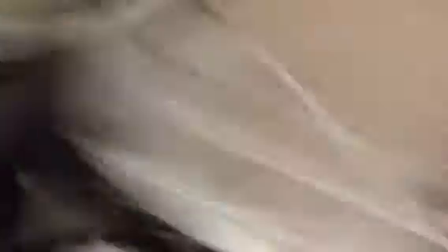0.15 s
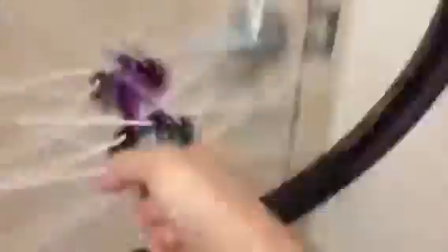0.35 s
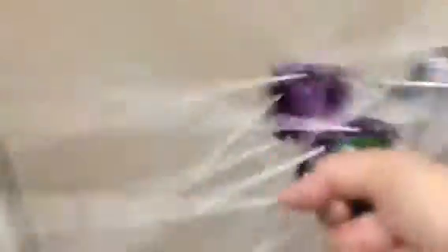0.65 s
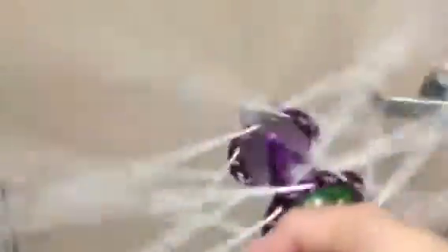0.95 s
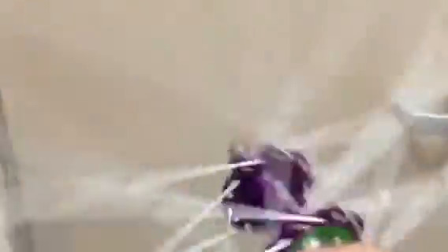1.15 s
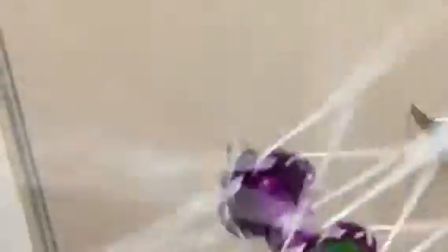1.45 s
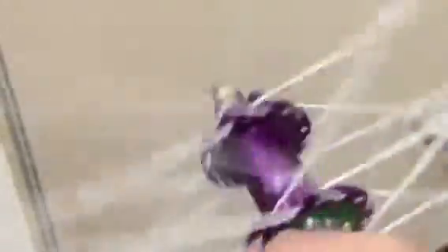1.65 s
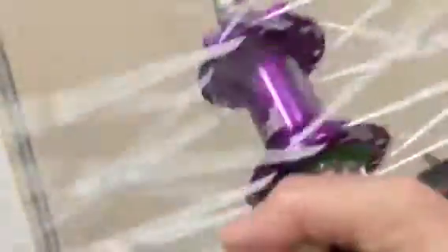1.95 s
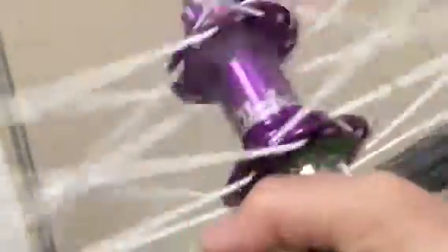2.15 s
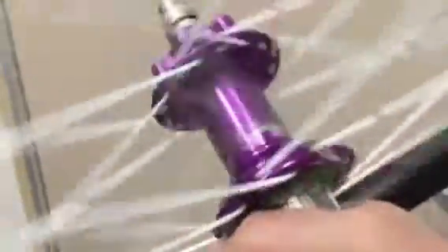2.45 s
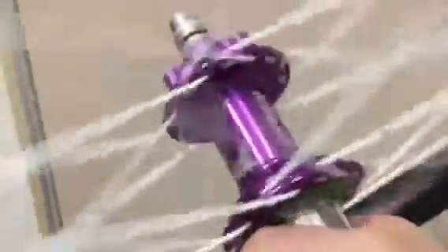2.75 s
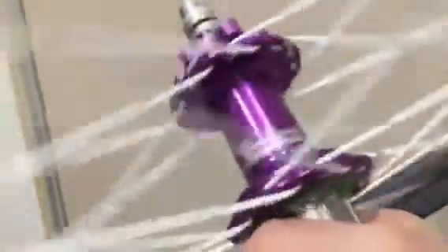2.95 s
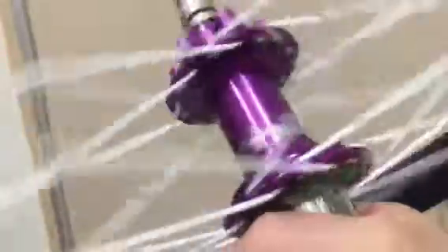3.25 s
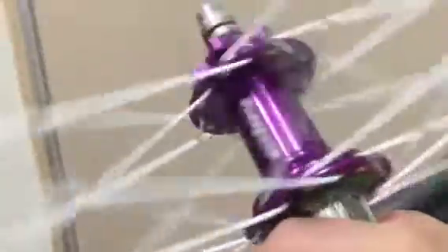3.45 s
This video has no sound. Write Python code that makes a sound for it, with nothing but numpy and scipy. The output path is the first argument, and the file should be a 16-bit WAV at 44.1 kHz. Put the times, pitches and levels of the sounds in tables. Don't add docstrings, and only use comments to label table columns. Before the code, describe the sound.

Close phone pickup of a coasting bicycle hub in a small, echoing room: dense, bright metallic ratcheting throughout, a few bumps right after the start, then fainter knocks as the clicking gradually slows, unevenly, to the end.

```python
import sys
import numpy as np
from scipy import signal
from scipy.fft import rfft, irfft
from scipy.io import wavfile

SR = 44100
rng = np.random.default_rng(int(sys.argv[2]) if len(sys.argv) > 2 else 0)


def volts_from_db(level):
    exponent = np.asarray(level, float) / 20
    return 10 ** exponent


def waveform_to_disk(signal):
    frames = np.transpose(np.atleast_2d(signal))
    scaled = np.clip(frames, -1, 1) * 32767
    samples = np.round(scaled).astype(np.int16)
    wavfile.write(sys.argv[1], SR, samples)


N = 158760

# (time [s], teeth passed [1/s])
WHEEL_SPEED = [(0.0, 137.12), (0.157, 139.74), (0.313, 136.15), (0.47, 139.26), (0.626, 133.53),
               (0.783, 132.86), (0.939, 135.16), (1.096, 132.78), (1.252, 128.77), (1.409, 107.65),
               (1.565, 110.79), (1.722, 105.65), (1.878, 123.03), (2.035, 118.32), (2.191, 118.61),
               (2.348, 111.96), (2.504, 110.14), (2.661, 109.32), (2.817, 103.59), (2.974, 101.69),
               (3.13, 100.37), (3.287, 97.62), (3.443, 96.62), (3.6, 92.91)]
# (time [s], level [dB], short spokes facing the phone [dB],
# shell facing the phone [dB], ticks through the hand [dB])
BUZZ_BALANCE = [(0, -27.5, 12.5, -8, -36), (.06, -23, 2, -2.5, -70), (.2, -22.5, -2, -1, -46),
                (.28, -23.5, 0.5, 0, -58), (.35, -24, 0, 1, -51), (.7, -22.5, -2, 0.5, -41),
                (.95, -23, 0.5, 0.5, -44), (1.3, -22.5, -4.5, -0.5, -36), (1.55, -21.5, -2, 1, -43),
                (1.62, -22.5, -1.5, 0.5, -31), (1.75, -22, -1.5, 0, -45), (2.1, -23, -1, 1, -27),
                (2.45, -22, -2.5, -0.5, -31), (2.7, -22, -2, 0.5, -31), (3.0, -22.5, -1, 0, -27),
                (3.3, -22.5, 0, 0.5, -28.5), (3.5, -21, -2.5, -1, -32), (3.6, -28.5, 4.5, 2, -25)]
# (time [s], peak
# level [dB])
HARD_DROPS = [(0.0533, -20), (0.0743, -11.5), (0.1177, -18), (0.1825, -15), (0.2179, -12.5), (0.2579, -10),
              (0.3701, -19), (0.4524, -12), (0.4799, -17), (0.5537, -10), (0.6749, -30), (0.7238, -10.5),
              (0.9732, -22), (1.0171, -22), (1.2042, -14), (1.2287, -12), (1.3758, -18), (1.4861, -26),
              (1.505, -16), (1.6512, -14), (2.0832, -19), (2.1835, -13), (2.2508, -18.5), (2.2867, -14),
              (2.3222, -16), (2.3301, -13.5), (2.3656, -12), (2.385, -14), (2.3955, -11.5), (2.4928, -29),
              (2.5921, -12), (2.6848, -22), (2.7392, -17), (2.7577, -10.5), (2.7876, -21), (2.7961, -12.5),
              (2.8345, -15), (2.854, -15), (2.8739, -13), (2.9038, -16), (2.9133, -13.5), (2.9328, -14),
              (2.9727, -11), (3.0011, -13), (3.0126, -10), (3.0505, -13.5), (3.0705, -14), (3.0904, -14),
              (3.1104, -19), (3.1588, -12.5), (3.2516, -12.5), (3.2925, -14), (3.3743, -15), (3.3957, -15),
              (3.4157, -17), (3.4257, -13), (3.5494, -22), (3.5623, -8.5)]
# (frequency [Hz], width [Hz], level [dB])
SPOKE_MODES = [(1136, 3.1, -3), (1216, 9.3, -5), (1326, 54, -9.5), (1512, 34, -5.5), (1684, 90, -5.5),
               (1826, 59, -6.5), (2051, 60, -7), (2450, 26, -8.5), (2854, 31, -0.5), (3104, 136, -4.5),
               (3273, 230, -2), (3559, 21, -0.5), (3918, 49, 1.5), (4323, 15, -2)]
# (frequency [Hz], width [Hz], level [dB])
SHELL_MODES = [(4544, 80, -8), (4713, 40, -3), (5350, 54, 2), (5700, 156, -2), (6310, 290, -6),
               (6510, 250, -3), (6755, 86, -7), (6980, 160, 3.5), (7320, 57, 2.5), (7840, 160, 0),
               (8500, 240, 0), (8640, 38, -17), (9240, 85, 3), (6200, 94, -29)]
# (frequency [Hz], width [Hz], level [dB])
PAWL_MODES = [(9650, 400, -4), (11400, 600, -5), (12100, 350, -1), (12750, 450, -3), (13550, 650, 0),
              (14800, 600, -2), (15550, 600, 0)]
# (time [s], length
# [s], frequency [Hz], level [dB])
FLARES = [(.03, 0.13, 3100, -24), (0.033, .1, 5350, -7), (0.078, 0.12, 1340, 2), (.1, 0.2, 1750, 4.5),
          (0.154, 0.22, 2200, 15), (0.22, 0.059, 1730, 10.5), (0.253, 0.088, 7370, 10.5),
          (0.265, 0.086, 8250, 5), (0.32, 0.066, 2450, 19), (0.397, .15, 1500, -2), (0.557, 0.11, 2050, 9),
          (0.61, 0.17, 1700, 6), (0.878, 0.57, 3150, 3), (0.938, .1, 5350, 0), (1.074, 0.13, 7000, 4.5),
          (1.253, 0.077, 5350, 4), (1.3, 0.3, 3070, 8.5), (1.42, 0.2, 1280, 10), (1.622, 0.068, 5350, 14),
          (1.617, 0.066, 7000, 7.5), (1.626, 0.069, 8700, 3), (1.78, .15, 1290, 7), (1.86, 0.17, 5350, 5),
          (1.875, 0.11, 3130, 1), (1.965, 0.041, 1750, 5), (2.146, .1, 5350, -6), (2.202, 0.25, 3100, 4),
          (2.34, 0.27, 1110, 8), (2.55, 0.097, 2200, 5), (2.627, .1, 1560, 11), (2.747, .2, 1120, 8),
          (3.032, .15, 3240, 0), (3.178, 0.044, 1800, 14.5), (3.325, .12, 1120, 7), (3.35, .1, 5350, -7),
          (3.446, .1, 1750, 4), (3.46, .08, 5350, 4)]
# (frequency [Hz], density [dB per Hz])
SNAP_SPECTRUM = [(700, -16.5), (1300, -8.5), (2600, 3), (4500, -4.5), (7500, 4.5), (9300, 12), (10300, -22),
                 (16000, 3)]
# (time [s], rumble level [dB], air level [dB])
HANDLING = [(0.0, -63, -7), (0.12, -50, 3), (0.22, -33.5, -1), (.38, -50, -8), (.5, -54, -3.5),
            (0.71, -75, -3), (1.28, -68, -1.5), (1.53, -67, -2.5), (2.26, -64, -2), (2.6, -71, -3),
            (3.1, -61, -2), (3.6, -58, -0.5)]
# (frequency [Hz], density [dB per Hz])
AIR_SPECTRUM = [(15, -21), (30, -22), (128, -1.5), (220, -10.5), (284, -11), (487, -17.5), (900, -12),
                (1170, -65)]
# (frequency [Hz], rms level [dB])
MAINS_HUM = [
    (119.5, -58),
    (274.5, -63.5),
]
# (time [s], crack level [dB], crack frequency [Hz],
# thump level [dB], thump frequency [Hz])
KNOCKS = [(.0990, -21.5, 690, -12.5, 74), (0.1015, -15.5, 284, -45, 67.5), (0.1873, -14.5, 870, -47, 75.4),
          (0.1889, -13, 340, -23, 72), (0.216, -29, 307, -28, 68), (.245, -57, 300, -35, 65),
          (0.271, -51, 300, -28, 80), (0.3, -44, 200, -40, 90), (.33, -55, 250, -36, 65),
          (.645, -27, 220, -33, 120), (0.702, -55, 200, -33, 65), (.875, -33, 280, -38, 70),
          (1.611, -34, 400, -42, 150), (2.07, -35, 260, -38, 65), (2.199, -42, 300, -41, 62),
          (3.39, -30, 605, -49, 90)]

TEETH, FIRST_TOOTH = 36, 0.52
SCATTER_MS, CLICK_SPREAD_DB, STEP_PER_DB = 1.5, 1.5, 0.0953
PLAIN_DROP_DB, HARD_SHARE = -17.5, 0.9
STRIKE_SMEAR_MS, MODE_SPREAD_DB, SWAY_DB, FLARE_OCTAVES = 0.25, 2.5, 2, 0.092
SNAP_DB, SPOKES_DB, LONG_SPOKES_DB, SHELL_DB, PAWLS_DB = -6, -10.5, -4.5, -6, -9
RATTLE_S, RATTLE_DB, EDGE_HZ, EDGE_DB, LOWEST_RING_HZ = 0.0057, -1, 9360, -17, 1085
PUSH_DB, PUSH_HZ, TICK_HZ, LOW_TICK_HZ, LOW_TICK_DB = -31, 99, 740, 280, -19.5
TICK_STEP_DB, TICK_SPREAD_DB, TICK_LAG_MS = 0.9, 1.3, 1.2
AIR_DB, ROOM_T60_S, ROOM_DB, ROOM_CHANGE_S = -49.5, 0.39, -0.5, 0.04
CRACK_T60_S, THUMP_T60_S = 0.0078, 0.04
CASE_HZ, CASE_DB, CASE_T60_S = 690, -28.5, 0.06


def rms_one(x):
    return x / np.sqrt(np.mean(x ** 2) + 1e-20)


def in_time(rows):
    s, *columns = np.transpose(rows)
    return [np.interp(np.arange(N) / SR, s, c) for c in columns]


def colour(x, points):
    hz, db = np.transpose(points)
    size = 4096
    bin_hz = np.arange(size // 2 + 1) * SR / size
    log_gain = np.interp(np.log(bin_hz + 1), np.log(hz), db) * np.log(10) / 20
    cepstrum = irfft(log_gain)
    cepstrum[1:size // 2] *= 2
    cepstrum[size // 2 + 1:] = 0
    return signal.fftconvolve(x, irfft(np.exp(rfft(cepstrum))))[:N]


def resonance(x, hz, width):
    r = np.exp(-np.pi * width / SR)
    poles = [1, -2 * r * np.cos(2 * np.pi * hz / SR), r * r]
    return signal.lfilter([(1 - r * r) / 2, 0, (r * r - 1) / 2], poles, x)


def ring(clicks, hz, t60):
    r, w = volts_from_db(-60 / (t60 * SR)), 2 * np.pi * hz / SR
    return signal.lfilter([0, np.sin(w)], [1, -2 * r * np.cos(w), r * r], clicks + 1e-18)


def train(at, size):
    return np.bincount(at, size, N) + 1e-18


def drops():
    teeth = np.cumsum(in_time(WHEEL_SPEED)[0]) / SR + FIRST_TOOTH
    at = np.flatnonzero(np.diff(np.floor(teeth)) > 0)
    draw = rng.standard_normal((len(at), 2, 3))
    late = np.abs(draw[:, 0]) * SCATTER_MS * [0.1, 1, 2] * SR / 1000
    tooth = np.arange(len(at))[:, None] + 0 * late
    step_db = STEP_PER_DB * np.maximum(in_time(BUZZ_BALANCE)[3] + 50, 0)
    db = CLICK_SPREAD_DB * draw[:, 1] + step_db[at, None] * (-1) ** tooth + [0, -3.0, -6.0]
    hard_s, hard_db = np.transpose(HARD_DROPS)
    nearest = np.abs(at[:, None] - hard_s * SR).argmin(axis=0)
    db[nearest, 0] = HARD_SHARE * (hard_db - PLAIN_DROP_DB)
    when = np.clip(at[:, None] + late, 0, N - 1).astype(int)
    return when.ravel(), tooth.ravel(), volts_from_db(db).ravel()


def flare_db(hz, s):
    at, length, centre_hz, db = np.transpose(FLARES)[:, :, None]
    time_off = 2 * (s - at) / length
    pitch_off = np.log2(hz / centre_hz) / FLARE_OCTAVES
    return np.sum(db * np.exp(-time_off ** 2 - pitch_off ** 2), axis=0)


def body(modes, at, tooth, size, shake):
    out, noise = 0, rng.standard_normal(N)
    for hz, width, db in modes:
        spread, sign, smear = rng.standard_normal((3, len(at)))
        turns = tooth / TEETH * rng.integers(1, 4) + rng.random()
        swing_db = SWAY_DB * np.cos(2 * np.pi * turns) + flare_db(hz, at / SR)
        gain = volts_from_db(db + np.interp(np.arange(N), at[::3], swing_db[::3]))
        when = np.clip(at + np.abs(smear) * STRIKE_SMEAR_MS * SR / 1000, 0, N - 1).astype(int)
        strike = train(when, size * volts_from_db(MODE_SPREAD_DB * spread) * np.sign(sign))
        out = out + gain * resonance(strike + shake * noise, hz, width)
    return rms_one(out)


def pawl_snap(at, size, clicks, shake):
    snap = rms_one(colour(clicks + shake * rng.standard_normal(N), SNAP_SPECTRUM))
    edge = rms_one(resonance(train(at[::3], size[::3] ** 2), EDGE_HZ, 1500.0))
    return volts_from_db(SNAP_DB) * snap + volts_from_db(EDGE_DB) * edge


def through_hand(at, tooth, tick_db):
    spread_db = TICK_SPREAD_DB * rng.standard_normal(len(at) // 3)
    first = train(at[::3], volts_from_db(TICK_STEP_DB * (-1) ** tooth[::3] + spread_db))
    first = np.roll(first, int(TICK_LAG_MS * SR / 1000))
    push = rms_one(resonance(first ** 0.5, PUSH_HZ, 49.0))
    low_tick = volts_from_db(LOW_TICK_DB) * resonance(first, LOW_TICK_HZ, 210.0)
    tick = rms_one(resonance(first, TICK_HZ, 880.0) + low_tick)
    return volts_from_db(PUSH_DB) * push - volts_from_db(tick_db + 1.5) * tick


def freehub():
    at, tooth, size = drops()
    size = size / np.sqrt(np.sum(size ** 2) / N)
    clicks = train(at, size)
    fade = np.exp(-1 / (RATTLE_S * SR))
    shake = volts_from_db(RATTLE_DB) * rms_one(signal.lfilter([1], [1, -fade], clicks))
    level_db, short_db, facing_db, tick_db = in_time(BUZZ_BALANCE)
    hits = at, tooth, size, shake

    snap = pawl_snap(at, size, clicks, shake)
    bright = volts_from_db(SHELL_DB) * body(SHELL_MODES, *hits) + volts_from_db(PAWLS_DB) * body(PAWL_MODES, *hits)
    spokes = volts_from_db(LONG_SPOKES_DB - facing_db) * body(SPOKE_MODES[:7], *hits)
    spokes = spokes + volts_from_db(short_db) * body(SPOKE_MODES[7:], *hits)
    buzz = snap + volts_from_db(SPOKES_DB) * spokes + volts_from_db(facing_db) * bright
    low_cut = signal.butter(10, LOWEST_RING_HZ, "high", fs=SR, output="sos")
    buzz = signal.sosfilt(low_cut, buzz)
    return volts_from_db(level_db) * buzz, volts_from_db(level_db) * through_hand(at, tooth, tick_db)


def room(x):
    t = np.arange(SR // 3) / SR
    shape = volts_from_db(-60 * t / ROOM_T60_S) * (t > 0.003)
    span = (np.arange(N) / (ROOM_CHANGE_S * SR)).astype(int)
    pattern = rng.integers(0, 12, 400)[span]
    tails = rng.standard_normal((12, len(t))) * shape / np.sqrt(np.sum(shape ** 2))
    echo = sum(signal.fftconvolve(x * (pattern == k), tail) for k, tail in enumerate(tails))
    echo[:len(t) - 1] += 1.4 * echo[N:]
    return echo[:N]


def background():
    rumble_db, air_db = in_time(HANDLING)
    air = volts_from_db(AIR_DB + air_db) * rms_one(colour(rng.standard_normal(N), AIR_SPECTRUM))
    lumps = resonance(resonance(rng.standard_normal(N), 50, 62.0), 50, 62.0)
    rumble = volts_from_db(rumble_db) * rms_one(lumps)
    hum = sum(volts_from_db(db) * rms_one(resonance(rng.standard_normal(N), hz, 4.3)) for hz, db in MAINS_HUM)
    return air + rumble + hum


def knocks():
    out = np.zeros(N)
    for s, crack_db, crack_hz, thump_db, thump_hz in KNOCKS:
        click = train([int(s * SR)], [1.0])
        out -= volts_from_db(crack_db) * ring(click, crack_hz, CRACK_T60_S)
        out -= volts_from_db(thump_db) * ring(np.roll(click, 300), thump_hz, THUMP_T60_S)
    first = train([int(KNOCKS[0][0] * SR)], [1.0])
    return out - volts_from_db(CASE_DB) * ring(first, CASE_HZ, CASE_T60_S)


def scene():
    buzz, push = freehub()
    return (buzz + volts_from_db(ROOM_DB) * room(buzz) + push + knocks() + background())[None]


def band_limit(x):
    return signal.sosfilt(signal.butter(12, 15730, fs=SR, output="sos"), x)


def record(dry):
    low_cut = signal.butter(3, 45, "high", fs=SR, output="sos")
    top_cut = signal.ellip(14, 0.3, 90, 15730, fs=SR, output="sos")
    mix = signal.sosfilt(top_cut, signal.sosfilt(low_cut, dry))
    return band_limit(mix)


dry = scene()
out = record(dry)
waveform_to_disk(out)
```